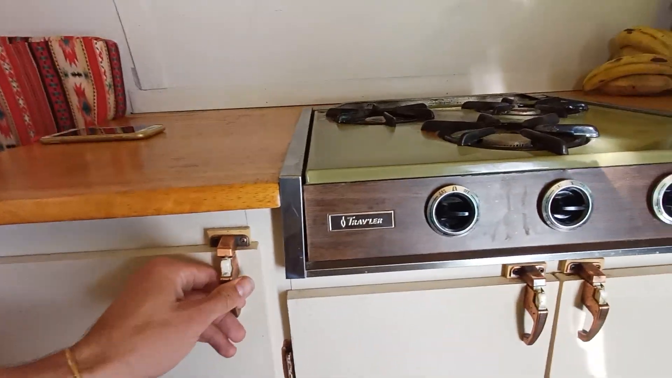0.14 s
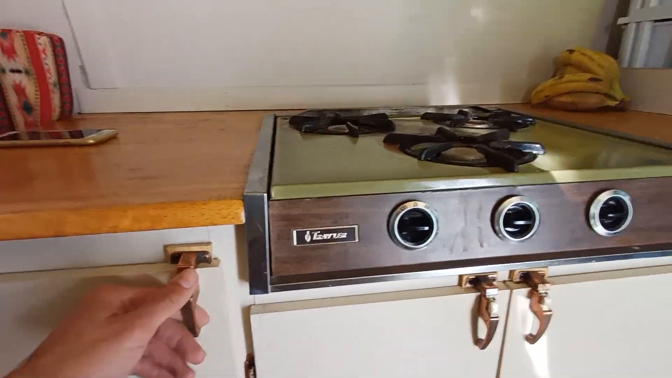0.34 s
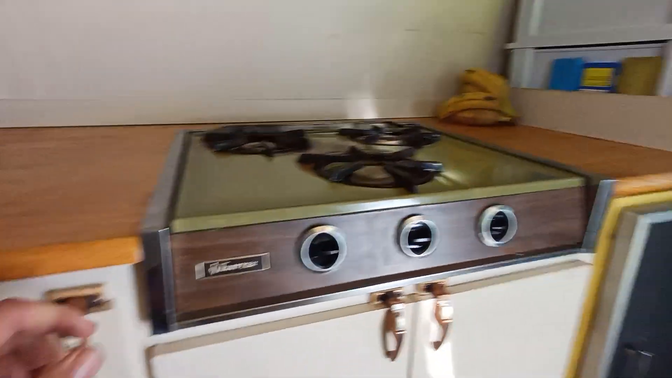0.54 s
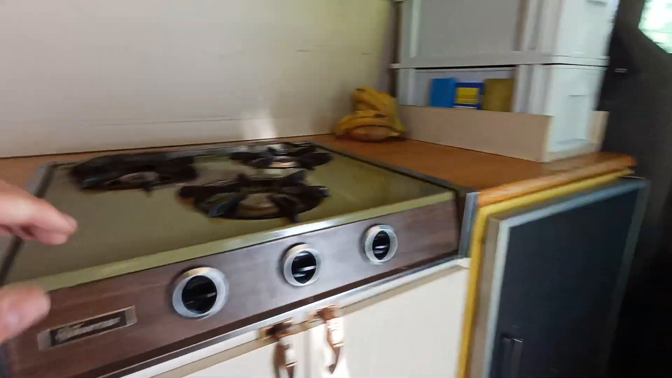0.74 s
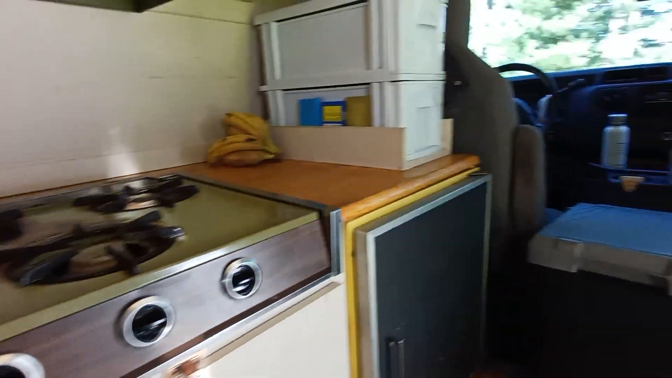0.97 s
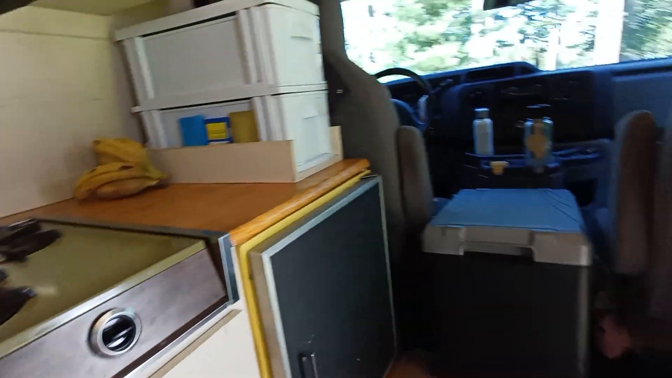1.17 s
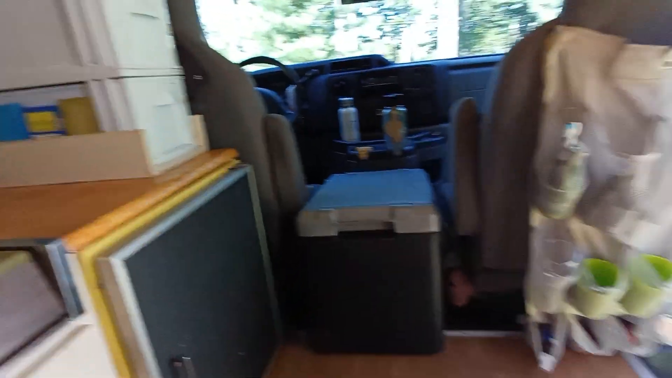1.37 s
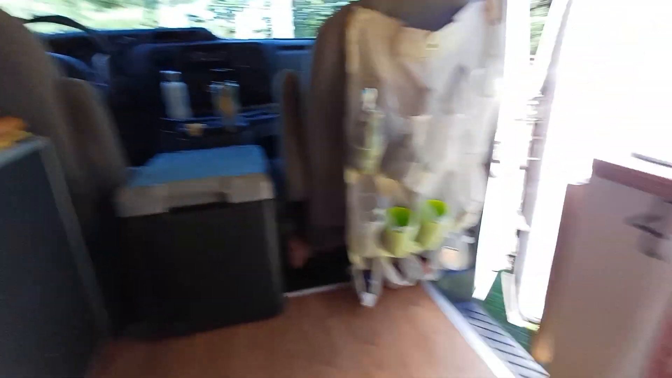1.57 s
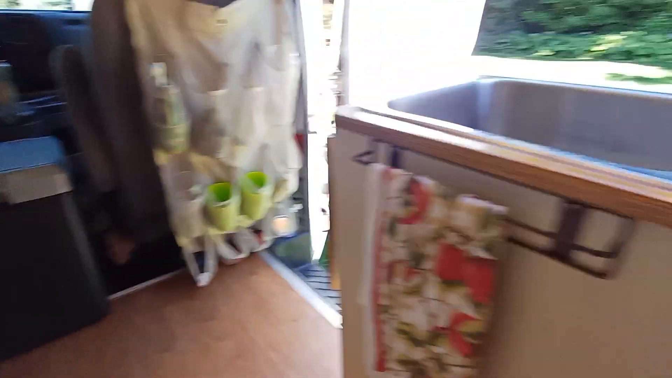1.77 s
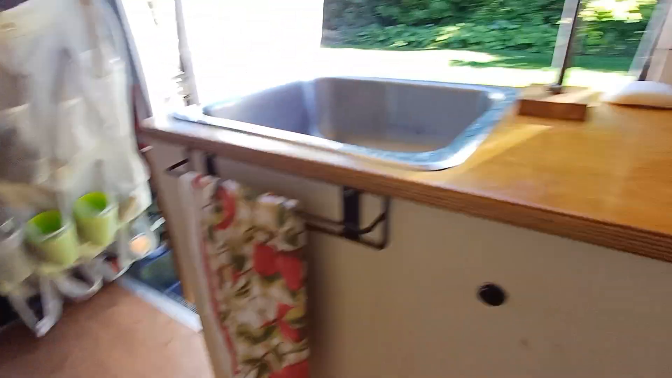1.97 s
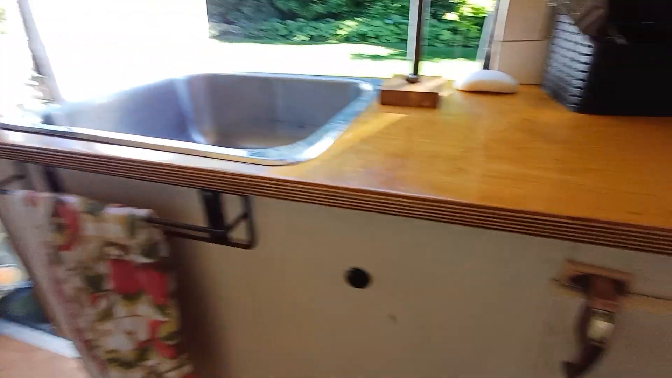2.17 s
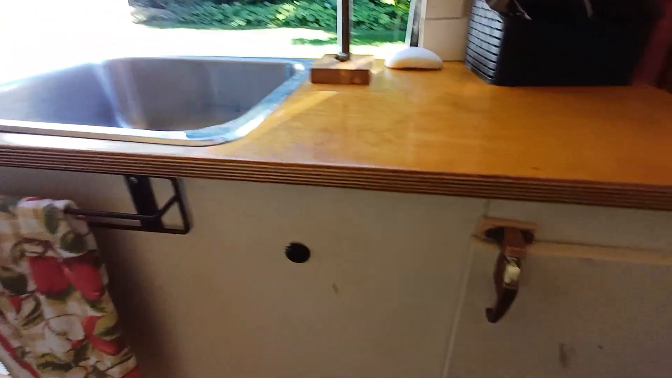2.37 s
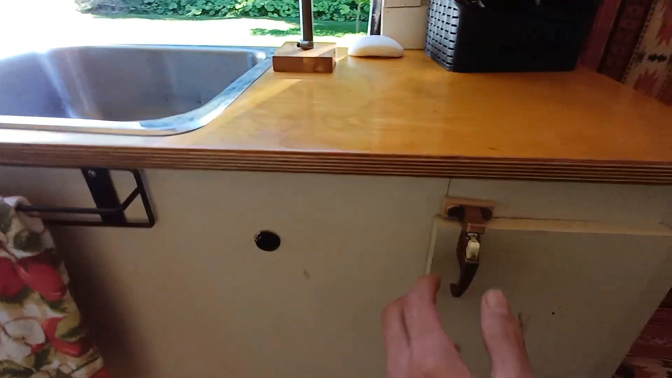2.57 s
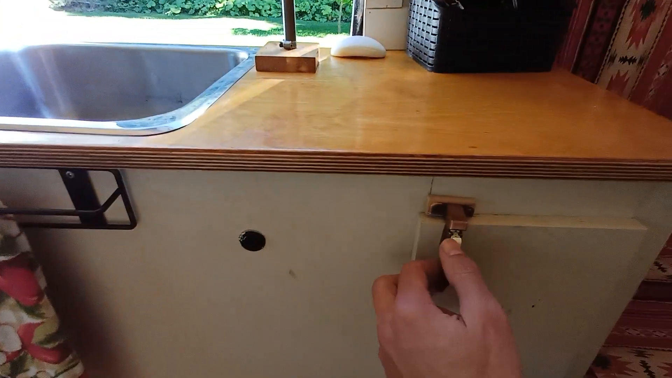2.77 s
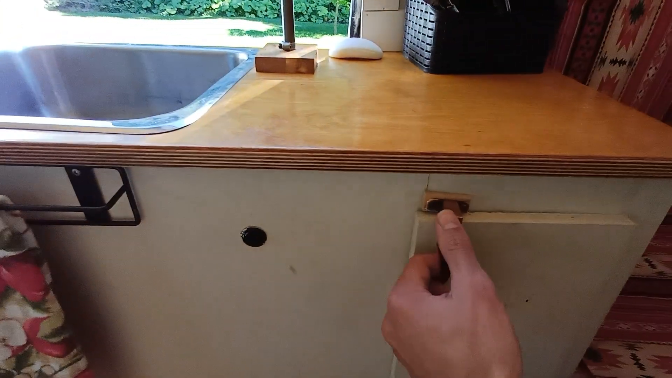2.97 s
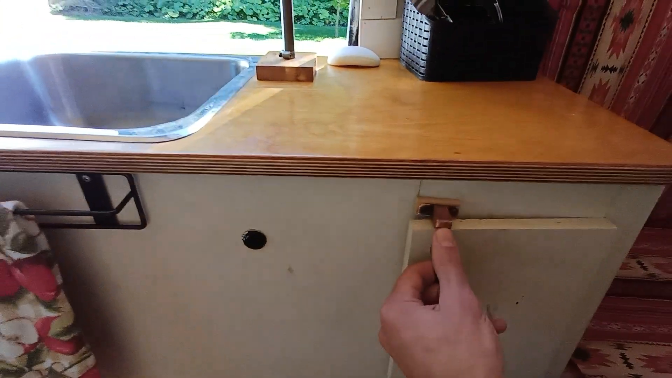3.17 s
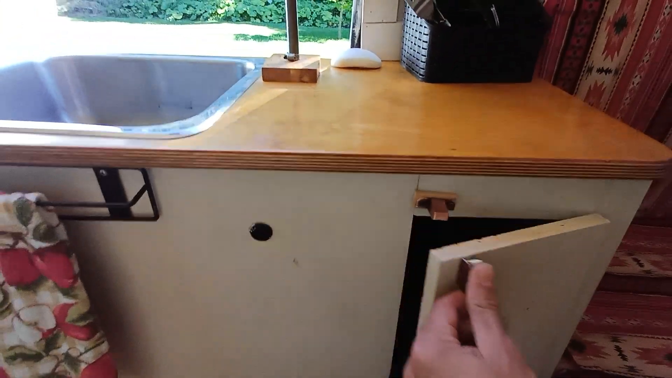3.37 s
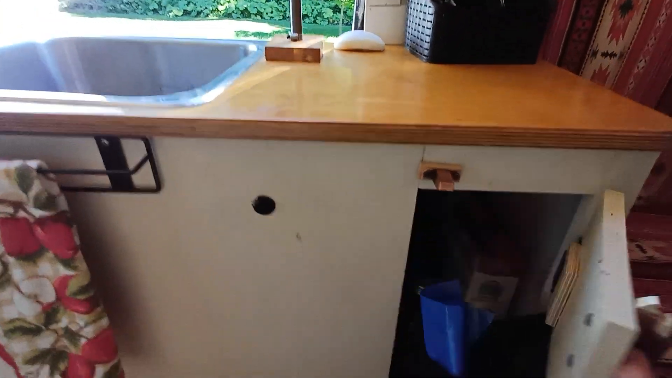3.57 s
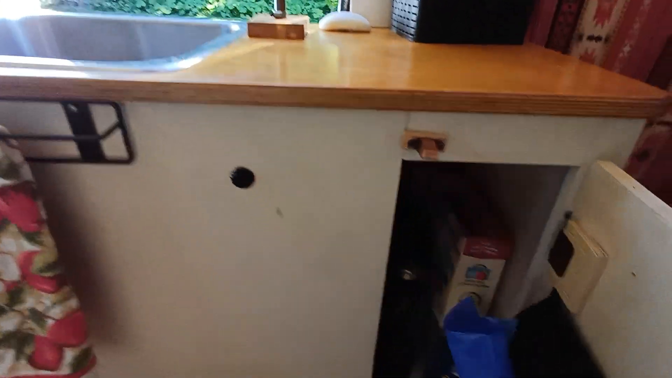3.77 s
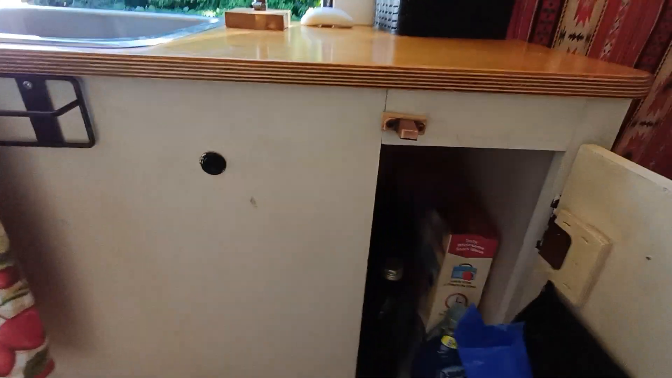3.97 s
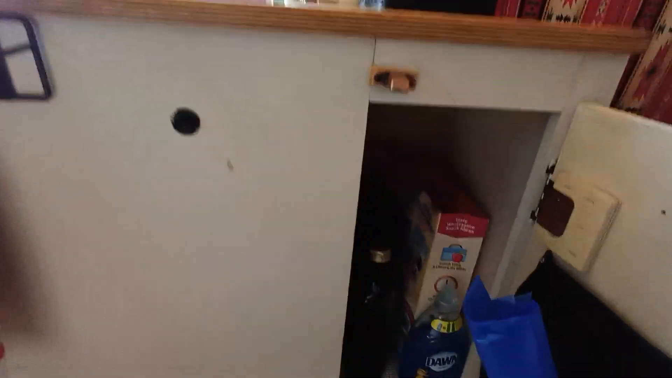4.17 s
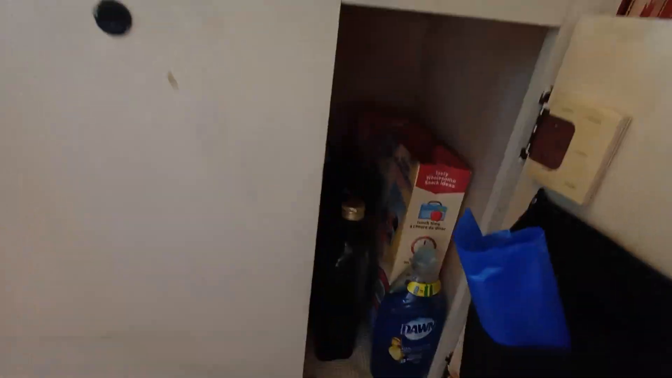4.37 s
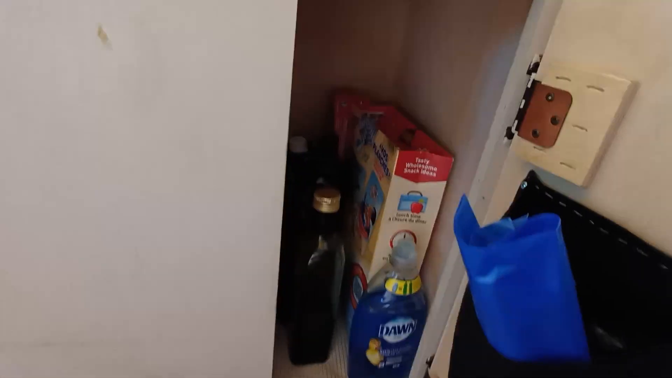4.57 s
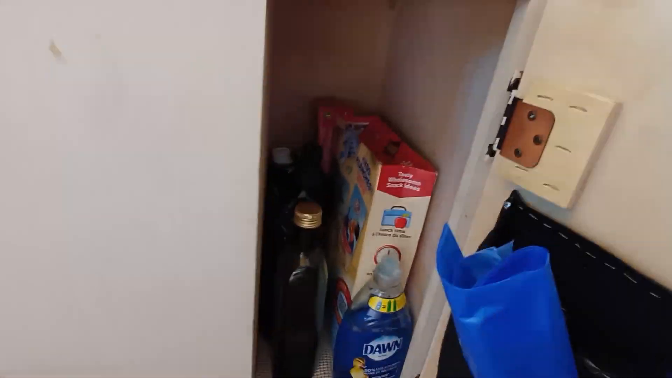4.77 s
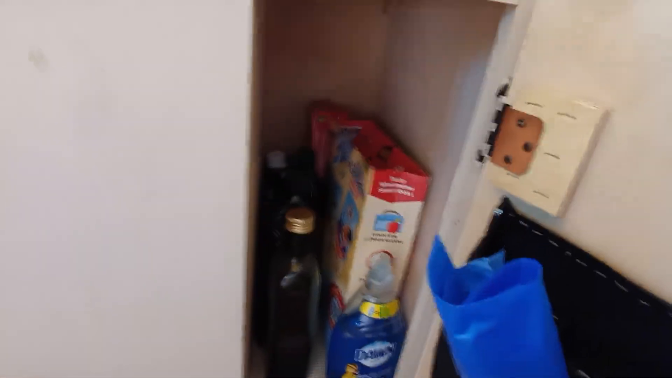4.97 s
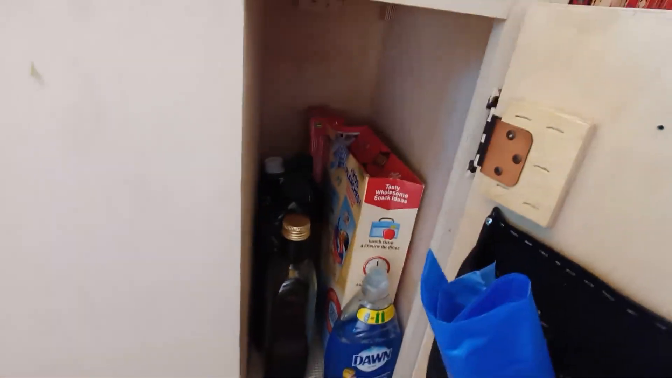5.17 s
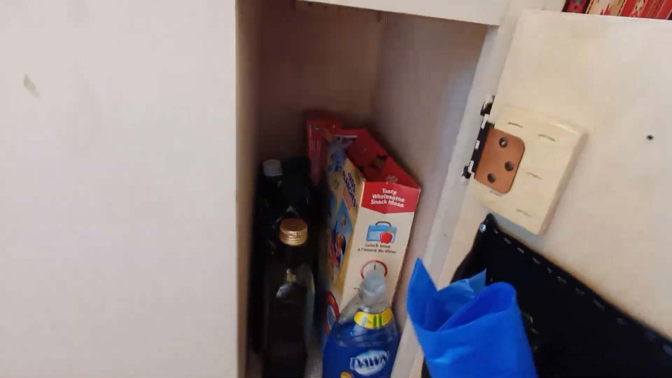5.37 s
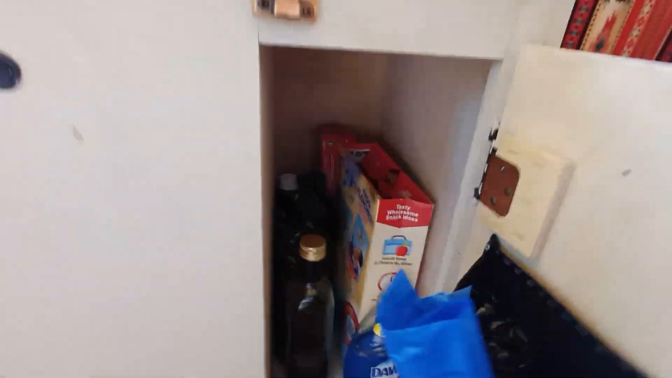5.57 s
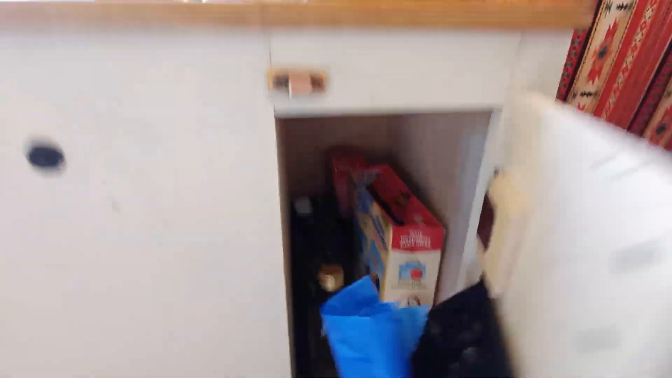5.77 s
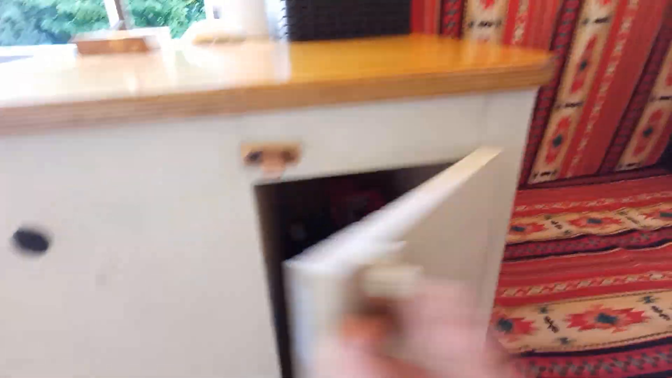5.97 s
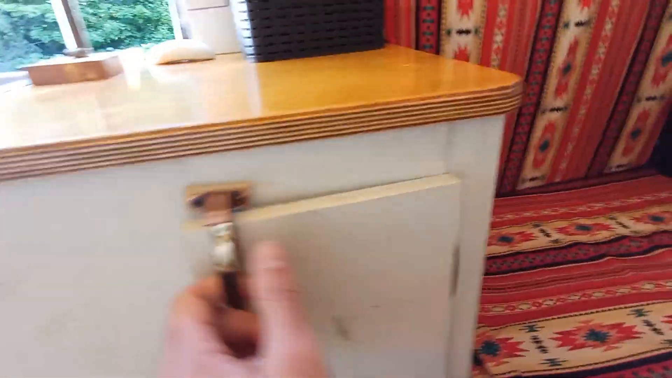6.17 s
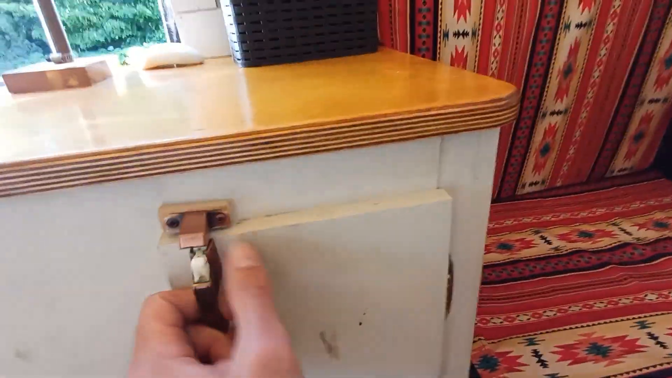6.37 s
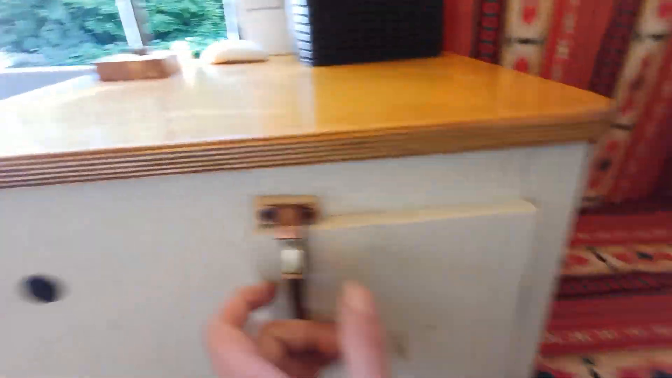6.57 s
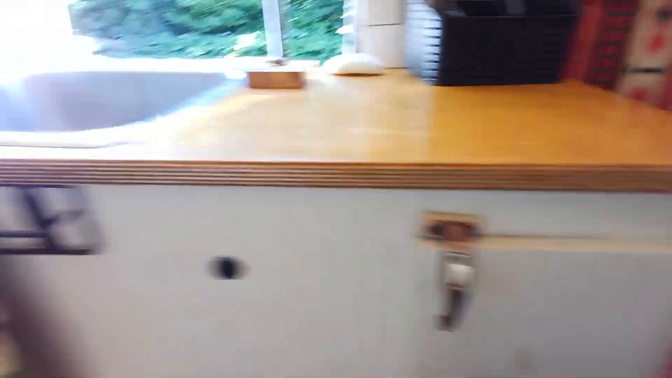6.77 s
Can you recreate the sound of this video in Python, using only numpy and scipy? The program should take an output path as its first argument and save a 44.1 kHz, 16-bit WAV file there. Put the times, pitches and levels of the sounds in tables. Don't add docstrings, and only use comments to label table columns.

```python
import sys
import numpy as np
from scipy import signal
from scipy.io import wavfile
from scipy.ndimage import uniform_filter1d

SR = 44100
rng = np.random.default_rng(int(sys.argv[2]) if len(sys.argv) > 2 else 0)


def wrap_up_sound(samples):
    columns = np.atleast_2d(samples).T
    tamed = np.clip(columns, -1, 1)
    steps = np.round(tamed * 32767).astype(np.int16)
    wavfile.write(sys.argv[1], SR, steps)


def invert_db(x):
    u = np.asarray(x, float) / 20
    return 10 ** u


N = 300762

# (frequency [Hz], level [dB], t60 [s])
FIRST_PANEL = [(285, -11, .08), (418, -12, .04), (727, 0, .055), (873, -13, .03), (1122, -9, .05),
               (1273, -6, .05), (1480, -17, .035), (1863, -10, .02), (2180, -11, .025), (2466, -11, .035),
               (2800, -15, .03)]
# (frequency [Hz], level [dB], t60 [s])
SECOND_BOX = [(70, -14, .12), (105, -7, .08), (135, 0, .16), (194, -6, .09), (277, -8, .09)]
# (frequency [Hz], density [dB per Hz])
SECOND_CATCH = [(1060, -42), (1800, -2.5), (2350, -4.5), (3080, -3), (3670, -10.5), (4210, -5),
                (5260, -17.5), (7010, -9), (8430, -22.5), (9080, -19.5), (9950, -20), (13000, -6),
                (14000, -16), (15500, -10), (16400, -25.5)]
# (frequency [Hz], likeness [-1 to 1])
FRICTION_SAME = [(60, 0.93), (240, 1), (950, 0.13), (3770, -0.048), (15000, 0.04)]
# (frequency [Hz], likeness [-1 to 1])
AIR_SAME = [(60, -0.16), (180, 0.85), (550, 0.55), (1650, -0.27), (4970, 0.98), (15000, -0.59)]


def evened(x):
    return x / np.sqrt(np.mean(x ** 2) + 1e-20)


def read(points, hz):
    f, value = np.transpose(points)
    return np.interp(np.log(hz + 1), np.log(f + 1), value)


def add(mix, s, sound):
    part = mix[:, round(s * SR):][:, :sound.shape[1]]
    part += sound[:, :part.shape[1]]


def panned(x, pan_db):
    return x * invert_db(np.array([pan_db / 2, -pan_db / 2]).reshape(2, -1))


def noise(length, colour, same, patchy_db, size):
    frames, hz = 4 * length // size + 5, np.fft.rfftfreq(size, 1 / SR)
    a, b, c, d, patches = rng.standard_normal((frames, len(hz), 5)).T
    patches = uniform_filter1d(patches, size=8, axis=0)
    patches = evened(uniform_filter1d(patches, size=10, axis=1))
    alike = np.clip(read(same, hz), -1, 1)[:, None]
    left = a + 1j * b
    right = alike * left + np.sqrt(1 - alike ** 2) * (c + 1j * d)
    z = np.array([left, right])
    z *= invert_db(colour(hz[:, None], frames) + patchy_db * patches)
    z *= hz[:, None] < 15900
    return evened(signal.istft(z, nperseg=size, noverlap=3 * size // 4)[1][:, :length])


def shudder(t, levels_db, t60):
    rise_s = 0.049
    power = 0
    for s, db in levels_db:
        power = power + invert_db(2 * (db - np.where(t < s, 10 * (s - t) / rise_s, 60 * (t - s) / t60)))
    return power


def outside():
    # (time [s], traffic wash [dB], rustle [dB])
    air_levels = [(0.0, -69, -88.5), (0.55, -70.5, -81.5), (0.72, -72, -87.5), (0.93, -70.5, -80),
                  (1.08, -68, -78), (1.37, -58.5, -75), (1.57, -63, -78), (1.9, -56, -78),
                  (2.2, -59.5, -72.5), (2.49, -64.5, -81.5), (2.8, -63.5, -78), (3.32, -58, -80.5),
                  (3.55, -61, -77), (4.85, -66, -85.5), (5.24, -60, -82.5), (5.5, -64, -83.5),
                  (6.19, -60, -82), (6.5, -65, -84.5)]
    # (frequency [Hz], density [dB per Hz])
    wash_colour = [(150, -57.5), (250, -20.5), (326, -13.5), (384, -18), (402, -20), (531, -11), (576, -12),
                   (690, -10), (790, -3), (860, -6), (949, -8), (1510, -8.5), (1860, -12.5), (2140, -16.5),
                   (2430, -27), (4000, -48), (5200, -68), (8800, -120)]
    rumble_colour = [(13, -46.5), (22, -17.5), (41, -6.5), (64, -2.5), (129, -7), (167, -14), (204, -14.5),
                     (242, -18.5), (320, -17.5), (420, -37), (700, -120)]
    hiss_colour = [(1800, -32.5), (3000, -3.5), (5000, -2), (9500, -8), (13000, -4.5), (15500, -7),
                   (16300, -9)]
    # (frequency [Hz], left minus right [dB])
    lean = [(60, -3), (180, 7.5), (550, 1), (1650, -5.5), (4970, -6), (15000, -2.5)]
    # (frequency [Hz], likeness [-1 to 1])
    rumble_same = [(30, 0.95), (150, 0.83), (400, 0.93)]
    # (time [s], wash [dB], rumble [dB])
    shudders = [
        (0.0, -29, -30),
        (0.14, -76, -39),
        (0.285, -47, -40.5),
        (0.52, -62, -56.5),
        (0.95, -71, -53.5),
        (1.17, -67, -61.5),
        (1.91, -74, -53.5),
        (2.41, -78, -67),
        (6.29, -57.5, -47),
    ]
    t = np.arange(N) / SR
    s, wash_db, hiss_db = np.transpose(air_levels)
    wash_db, hiss_db = np.interp(t, s, wash_db), np.interp(t, s, hiss_db)
    swell = evened(sum(np.sin(2 * np.pi * (f * t + rng.random())) for f in (0.7, 1.3, 2.1, 3.4)))
    rumble_db = -64.5 + 0.69 * (wash_db + 63) + 0.6 * swell
    blows = np.array(shudders)

    def leaning_wash(hz, frames):
        return read(wash_colour, hz) + np.array([.5, -.5])[:, None, None] * read(lean, hz)
    wash = noise(N, leaning_wash, AIR_SAME, 2.0, size=1024)
    rumble = noise(N, lambda hz, frames: read(rumble_colour, hz), rumble_same, 1.4, size=4096)
    hiss = noise(N, lambda hz, frames: read(hiss_colour, hz), FRICTION_SAME, 0.94, size=512)
    wash *= np.sqrt(invert_db(2 * wash_db) + shudder(t, blows[:, [0, 1]], t60=0.33))
    rumble *= np.sqrt(invert_db(2 * rumble_db) + shudder(t, blows[:, [0, 2]], t60=0.43))
    return invert_db(4.0) * wash + invert_db(4.5) * rumble + invert_db(hiss_db) * hiss


def cab_air():
    # (time [s], level [dB])
    drumming = [
        (.3, -57),
        (.7, -80.5),
        (1.0, -70.5),
        (1.3, -62.5),
        (1.6, -67),
        (1.9, -67),
        (2.2, -81.5),
    ]
    # (frequency [Hz], density [dB per Hz])
    cavity_colour = [(280, -27.5), (360, -7), (450, 2), (560, -38.5)]
    out = np.zeros((2, N))
    s, db = np.transpose(drumming)
    t = np.arange(s[0], s[-1], 1 / SR)
    air = noise(len(t), lambda hz, frames: read(cavity_colour, hz), AIR_SAME, 3.5, size=1024)
    add(out, s[0], air * invert_db(np.interp(t, s, db)) * signal.windows.tukey(len(t), .1))
    return out


def far_engine():
    # (start [s], length [s], pitch [Hz], level [dB])
    drones = [
        (3.483, 0.1, 293, -68.5),
        (3.616, 0.39, 303, -68),
        (4.062, 0.14, 298, -71),
    ]
    out = np.zeros((2, N))
    for start, length, hz, db in drones:
        t = np.arange(0, length, 1 / SR)
        waver = invert_db(3.3 * evened(uniform_filter1d(rng.standard_normal(len(t)), size=2000)))
        tone = np.sqrt(2) * np.sin(2 * np.pi * hz * t) * waver
        add(out, start, panned(tone * invert_db(db) * signal.windows.tukey(len(t), .7), -1.3))
    return out


def slide(start, peak, end, pressure_db, top_db, hump_hz):
    # (frequency [Hz], density [dB per Hz])
    grit_colour = [(120, -41), (250, -12), (700, -14.5), (1400, -11), (2300, -8.5), (3600, -10),
                   (6500, -13.5), (8000, -13), (9600, -20.5), (12000, -13), (15500, -21.5), (16400, -46.5)]
    t = np.arange(start, end, 1 / SR)

    def colour(hz, frames):
        along = np.clip(np.arange(frames) * 64 / len(t), 0, 1) - .5
        centre_hz = hump_hz * 2 ** (.3 * along)
        hump = 9 * np.exp(-(np.log((hz + 1) / centre_hz) / .5) ** 2)
        fine_top = (top_db + 11.0) * np.clip(np.log2((hz + 1) / 5000), 0, 1)
        return read(grit_colour, hz) + hump + fine_top
    grains = invert_db(0.7 * evened(uniform_filter1d(rng.standard_normal(len(t)), size=150)))
    grit = noise(len(t), colour, FRICTION_SAME, 1.4, size=256)
    grit *= grains * signal.windows.tukey(len(t), .08)
    press_db, lift_db, blunt = 38, 30.5, 2.24
    depth = np.interp(t, [start, peak, end], [press_db ** (1 / blunt), 0, lift_db ** (1 / blunt)])
    return panned(grit * invert_db(pressure_db - depth ** blunt + 4.5), -2)


def slides():
    # (start [s], firmest [s], end [s])
    strokes = [(0.78, 0.885, 1.02), (1.1, 1.32, 1.46), (1.25, 1.42, 1.49), (1.42, 1.69, 1.85),
               (1.69, 1.83, 1.98), (1.76, 1.94, 2.14), (1.96, 2.015, 2.08), (2.09, 2.19, 2.28),
               (2.15, 2.25, 2.5), (3.25, 3.41, 3.5), (3.4, 3.426, 3.47), (3.4, 3.495, 3.56),
               (3.48, 3.54, 3.7), (3.77, 3.85, 4.0), (3.85, 3.95, 4.15), (5.05, 5.25, 5.42),
               (5.92, 5.995, 6.08), (6.11, 6.2, 6.4), (6.53, 6.595, 6.68), (6.54, 6.61, 6.78)]
    # (pressure [dB], fine top over it [dB], centre of the hiss [Hz])
    feel = [(-68, -10.5, 4100), (-52, -5.5, 3000), (-54.5, -11, 3600), (-65, -8, 3600), (-34.5, -16, 2800),
            (-34.5, -15, 3660), (-46, -4, 3800), (-48, -13.5, 3200), (-79.5, -10, 3800), (-71.5, 6, 5100),
            (-52.5, -16, 2000), (-57, -15, 3400), (-92, -14, 3100), (-56.5, -26, 2040), (-79, -14, 3000),
            (-80.5, -24.5, 2200), (-77, -17, 2600), (-62, -4.5, 3500), (-73.5, -29, 1960),
            (-83.5, 12, 3700)]
    out = np.zeros((2, N))
    for row in np.c_[strokes, feel]:
        add(out, row[0], slide(*row))
    return out


def soft_hisses():
    # (start [s], end [s], level [dB], change to the end [dB])
    hiss_spans = [
        (2.409, 2.691, -65, -6),
        (2.685, 3.05, -65, -28),
        (3.142, 3.415, -68, 5),
    ]
    # (frequency [Hz], density [dB per Hz])
    band_colour = [(900, -34), (1500, -9), (1760, -14), (2020, 0), (2500, -18), (2850, -20), (3150, -11),
                   (3600, -20), (4300, -21), (4700, -17), (5200, -27), (8200, -32), (12500, -38),
                   (15900, -36)]
    out = np.zeros((2, N))
    for start, end, pressure_db, change_db in hiss_spans:
        t = np.arange(start, end, 1 / SR)
        airy = noise(len(t), lambda hz, frames: read(band_colour, hz), FRICTION_SAME, 2.9, size=512)
        level_db = pressure_db + change_db * (t - start) / (end - start)
        add(out, start, panned(airy * invert_db(level_db + 4.5) * signal.windows.tukey(len(t), .1), -5.5))
    return out


def cabin(x):
    # (frequency [Hz], t60 [s])
    decay = [(100, 0.082), (400, 0.16), (1500, 0.075), (5000, .12), (14000, 0.02)]
    # (frequency [Hz], level [dB])
    soft_walls = [(500, -1), (2000, 2.5), (5000, -4), (14000, -5.5)]
    taps = np.zeros((2, SR // 3))
    slots = np.arange(60, SR // 3 - 12, 12)
    at = slots + rng.integers(0, 12, (2, len(slots)))
    np.put_along_axis(taps, at, rng.choice([-1., 1.], at.shape), 1)
    hz, t, z = signal.stft(taps, SR, nperseg=256)
    alike = np.exp(-(hz[:, None] / 1200) ** 2)
    z[1] = alike * z[0] + np.sqrt(1 - alike ** 2) * z[1]
    z *= 1 - np.exp(-(hz[:, None] / 300) ** 2)
    fall_db = -60 * t / read(decay, hz)[:, None]
    late = invert_db(-21.5 + fall_db / 2.2)
    z *= invert_db(read(soft_walls, hz)[:, None]) * (invert_db(fall_db) + late)
    tail = signal.istft(z, SR, nperseg=256)[1]
    return signal.fftconvolve(x, tail / np.linalg.norm(tail[0]), axes=1)[:, :N]


def ring(modes, contact_s, dense_db, centre_hz=None):
    hz, db, t60 = np.transpose(modes)
    t = np.arange(round(1.2 * t60.max() * SR)) / SR
    place = (np.arange(48) + rng.random(48)) / 48
    crowd = np.interp(place * (len(hz) - 1), np.arange(len(hz)), hz)
    db = np.r_[db, np.interp(crowd, hz, db) + dense_db]
    t60 = np.r_[t60, .5 * np.interp(crowd, hz, t60)]
    hz = np.r_[hz, crowd]
    if centre_hz:
        db = db - 7 * np.log2(hz / centre_hz) ** 2
    spot, left, right = rng.standard_normal((3, len(hz)))
    hz = hz * (1 + 0.007 * spot)
    turn = np.clip(hz / 2500, 0, 2) * np.array([left, right])
    weight = np.sign(spot) * invert_db(db + 0.5 * spot) * np.exp(1j * turn)
    poles = 2j * np.pi * hz - np.log(1000) / t60
    out = (weight @ np.exp(np.outer(poles, t))).imag
    out *= 1 - np.exp(-t / contact_s)
    return out / abs(out).max()


def snap(colour, t60):
    # (frequency [Hz], likeness [-1 to 1])
    metal_same = [(2000, 0.52), (5000, 0.22), (14000, .05)]
    t = np.arange(SR // 12) / SR
    burst = noise(len(t) + 256, lambda hz, frames: read(colour, hz), metal_same, 3.0, size=256)[:, 256:]
    decay = invert_db(-60 * t / t60) + 0.59 * invert_db(-60 * t / (3.1 * t60))
    burst *= decay * (1 - np.exp(-t / 0.00043))
    return burst / abs(burst).max()


def hits(rows, pan_db, panel, catch, catch_t60, box, trims_db):
    out = np.zeros((2, N))
    for s, knock_db, catch_db, thump_db, centre_hz in rows:
        knock = invert_db(knock_db + trims_db[0]) * ring(panel, 0.00023, -11, centre_hz)
        click = invert_db(catch_db + trims_db[1]) * snap(catch, catch_t60)
        thump = invert_db(thump_db + trims_db[2]) * ring(box, 0.0023, -20.5)
        add(out, s, panned(knock, pan_db))
        add(out, s, panned(click, .5 * pan_db))
        add(out, s, thump)
    return out


def footsteps():
    # (time [s], knock [dB], tick [dB], thump [dB], centre of the knock [Hz])
    contacts = [
        (0.894, -48, -69, -44, 306),
        (0.912, -49.5, -66, -42, 365.8),
        (0.949, -49, -66, -42.5, 313),
        (1.083, -44.5, -42.5, -43, 330),
        (1.094, -46, -51, -71, 301),
        (1.997, -29, -42, -52, 685),
        (2.03, -29.5, -56.5, -55, 685),
        (3.297, -43, -80.5, -43, 300),
        (3.488, -44, -66, -38.5, 306),
        (5.991, -64, -74, -73, 781),
    ]
    # (frequency [Hz], level [dB], t60 [s])
    floorboard = [(65, -24, .15), (88, 17, 0.078), (140, -2, 0.094), (247, -0.5, 0.24)]
    # (frequency [Hz], density [dB per Hz])
    tick_colour = [(1500, -23), (3000, -8), (7000, -5), (11500, 1), (16000, 1)]
    return hits(contacts, -5, FIRST_PANEL, tick_colour, 0.039, floorboard, (-6.2, 3.2, -3.2))


def first_door():
    # (time [s], panel knock [dB], metal catch [dB], cabinet thump [dB], centre of the knock [Hz])
    contacts = [(0.0, -17, -18, 4, 1900), (0.007, -8.5, -18, -3.5, 765), (0.011, -7.5, -17.5, -7, 730),
                (0.014, -9.5, -23, -24, 730), (0.021, -12, -22, -26, 1270), (0.026, -18, -21, -1.5, 500),
                (0.042, -4, -18.5, -26, 730), (0.049, -15, -23, -45, 1280), (0.056, -25, -24, -44, 1120),
                (0.072, -25, -28, -19, 800), (0.078, -13.5, -26.5, -40, 410), (0.085, -18, -38.5, -45, 730),
                (0.1243, -30, -23, -29, 2600), (0.13, -22.5, -41, -10, 393), (0.138, -22.5, -58, -55, 347),
                (0.2115, -17.5, -27.5, -16, 1240), (0.216, -20.5, -39.5, -40, 1270),
                (0.223, -20.5, -33.5, -30, 350), (0.229, -19.5, -32.5, -17, 300),
                (0.236, -22, -40, -12.5, 730), (0.25, -25, -40.5, -37, 1270),
                (0.261, -22.5, -56, -42, 1270), (0.269, -30.5, -60, -6.5, 310), (0.275, -26, -32, -18, 360),
                (0.285, -20, -34, -41.5, 730), (0.318, -37, -47, -32, 404.4),
                (0.335, -38.5, -51.5, -21.5, 689), (0.508, -42.5, -49, -41.5, 355)]
    # (frequency [Hz], level [dB], t60 [s])
    first_box = [(60, -2, .13), (88, -3, .08), (110, -4, .07), (138, 0, .1), (240, -6, .06)]
    # (frequency [Hz], density [dB per Hz])
    first_catch = [(1060, -35.5), (1800, -1), (2860, -4), (3500, -8), (4370, -7), (7010, -15.5),
                   (11900, -15), (15100, -15), (16400, -24.5)]
    return hits(contacts, 0.8, FIRST_PANEL, first_catch, 0.025, first_box, (-3.2, 0.1, -14.))


def opening_door():
    # (time [s], panel knock [dB], metal catch [dB], cabinet thump [dB], centre of the knock [Hz])
    contacts = [(2.695, -39, -55.5, -49, 500), (2.7, -40, -58, -43, 1300), (2.708, -36, -70, -40, 340),
                (2.716, -38, -70, -40, 340), (2.724, -34.5, -73, -46, 342), (2.74, -38.5, -75, -42, 400),
                (2.784, -26, -70, -34.5, 343), (2.786, -28, -72, -25, 1170),
                (2.983, -61.5, -76, -39.5, 824), (3.059, -35, -47.5, -38.5, 1100),
                (3.063, -31, -65, -36, 344), (3.072, -34.5, -67, -40, 344), (3.086, -31, -32.5, -34.5, 400),
                (3.095, -18, -24, -38, 2340), (3.098, -23, -41, -50, 680), (3.1, -20, -37, -43, 1090),
                (3.107, -38, -50, -37, 1690), (3.112, -53, -73, -25, 344), (3.421, -44, -50, -56, 2030),
                (3.427, -32, -43, -48, 1120), (3.434, -31, -52.5, -51, 2030), (3.464, -44, -74, -36.5, 342)]
    # (frequency [Hz], level [dB], t60 [s])
    held_panel = [(343, 1, 0.054), (500, -10.5, 0.026), (651, -4, 0.039), (966, -7.5, 0.045),
                  (1117, -2, 0.027), (1177.2, -6.5, 0.038), (1452, -9.5, 0.031), (1654, -7.5, 0.043),
                  (1734.5, -10, .04), (1900, -12.5, 0.044), (2185, -8, .04), (2328, -2.5, .035),
                  (2900, -8, .035), (3300, -7.5, .035)]
    hand_damping = 0.62
    panel = [(hz, db, hand_damping * t60) for hz, db, t60 in held_panel]
    box = [(hz, db, hand_damping * t60) for hz, db, t60 in SECOND_BOX]
    gentle = [(hz, db - 7 * (hz > 9000)) for hz, db in SECOND_CATCH]
    return hits(contacts, -4, panel, gentle, 0.016, box, (-3.3, 1.5, -3.5))


def slammed_door():
    # (time [s], panel knock [dB], metal catch [dB], cabinet thump [dB], centre of the knock [Hz])
    contacts = [(6.231, -23.5, -27, -50.5, 2820), (6.237, -21.5, -35, -30.5, 1640),
                (6.2503, -19, -2.5, -25, 2900), (6.2525, -10, -6.5, -23, 1159),
                (6.257, -17, -23, -35.5, 2300), (6.2635, -6, -18.5, -15.5, 954),
                (6.2662, 0, -29.5, -24.5, 1210), (6.2655, -6.5, -27.5, -18.5, 343),
                (6.27, -7, -28.5, -30, 1713), (6.278, -22, -35, -24, 1108),
                (6.287, -17.5, -36, -21.5, 1154), (6.292, -23.5, -38, -16.5, 343),
                (6.335, -42, -69, -39, 343), (6.405, -48.5, -78, -44, 343), (6.43, -49.5, -80, -48, 343),
                (6.558, -45, -56.5, -71, 725), (6.594, -46, -72, -57, 1132)]
    # (frequency [Hz], level [dB], t60 [s])
    free_panel = [(343, 0, .07), (490, -15, .04), (640, -11, .045), (975, -6, .045), (1115, -1, .05),
                  (1174, -5, .045), (1455, -10, .04), (1680, -7, .04), (1745, -8, .04), (1900, -12, .035),
                  (2200, -7, .04), (2290, -9, .035), (2900, -9, .03), (3200, -11, .03)]
    return hits(contacts, -2.5, free_panel, SECOND_CATCH, 0.0056, SECOND_BOX, (-3.2, 1.6, -3.4))


def scene():
    steady = outside() + cab_air() + far_engine() + slides() + soft_hisses()
    near = footsteps() + first_door() + opening_door() + slammed_door()
    return near + invert_db(-7.5) * cabin(near) + steady


def roll_off(x):
    return signal.sosfilt(signal.butter(12, 16980, fs=SR, output="sos"), x)


def record(dry):
    low_cut = signal.butter(2, 40, "high", fs=SR, output="sos")
    return roll_off(signal.sosfilt(low_cut, dry))


dry = scene()
out = record(dry)
wrap_up_sound(out)
```